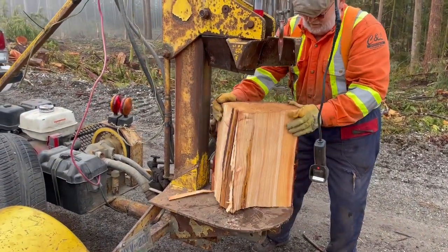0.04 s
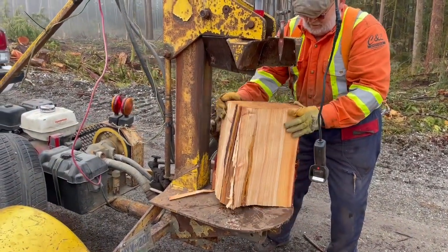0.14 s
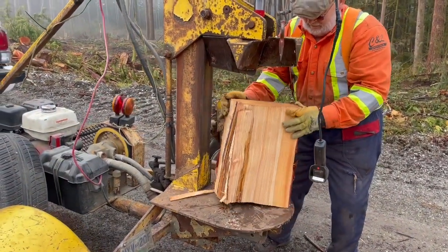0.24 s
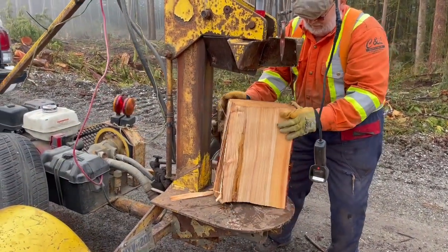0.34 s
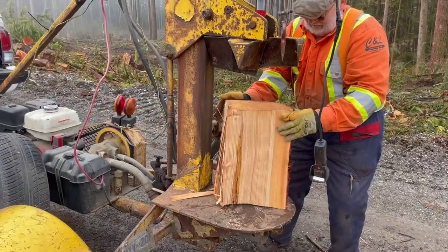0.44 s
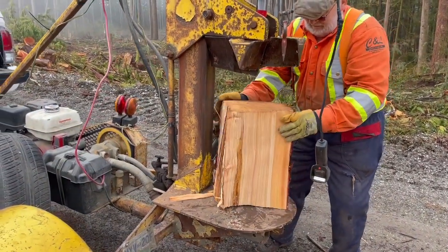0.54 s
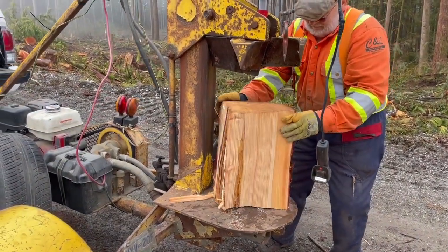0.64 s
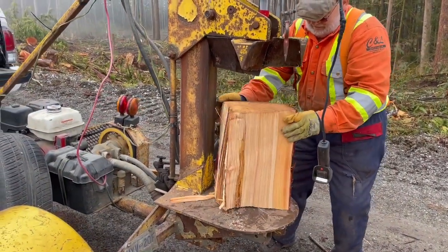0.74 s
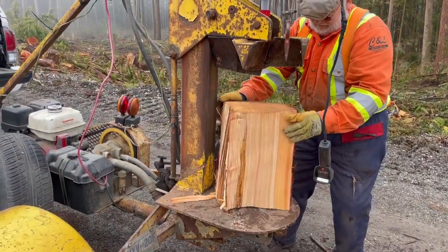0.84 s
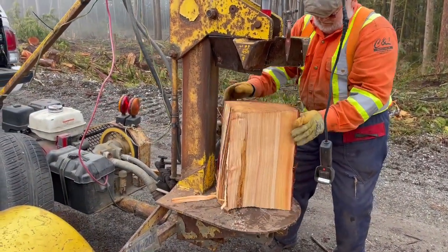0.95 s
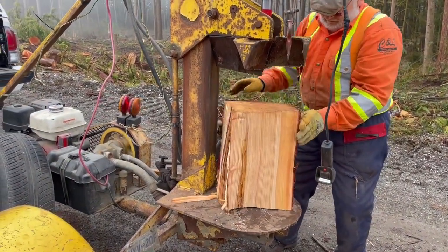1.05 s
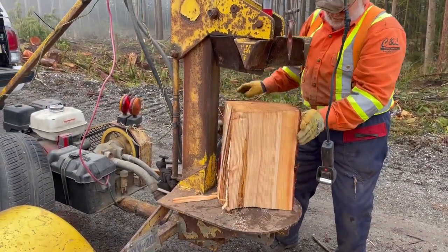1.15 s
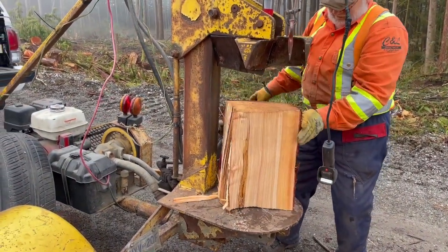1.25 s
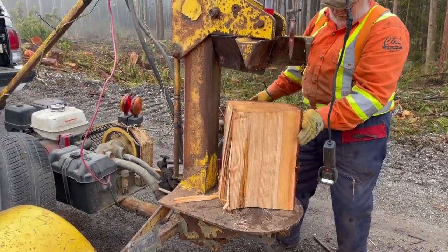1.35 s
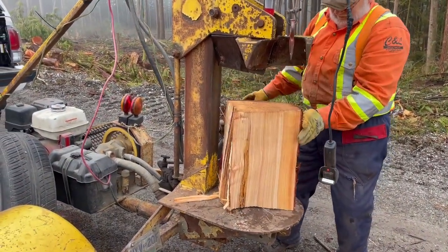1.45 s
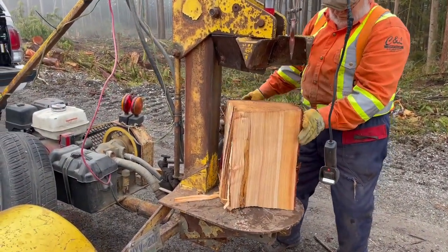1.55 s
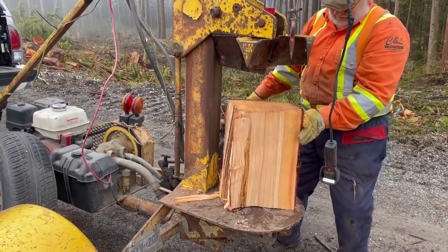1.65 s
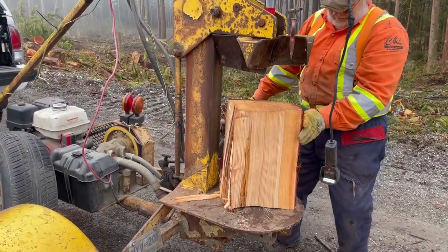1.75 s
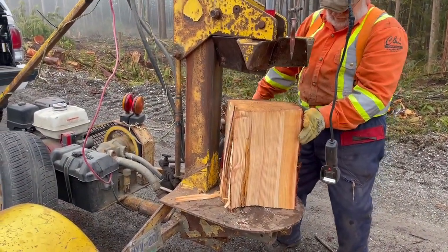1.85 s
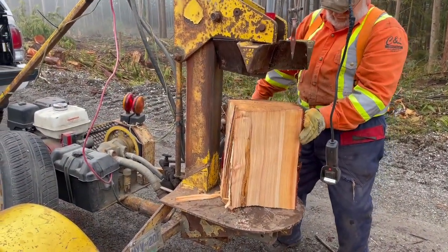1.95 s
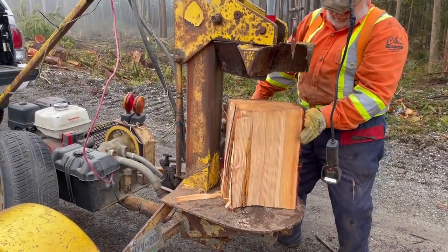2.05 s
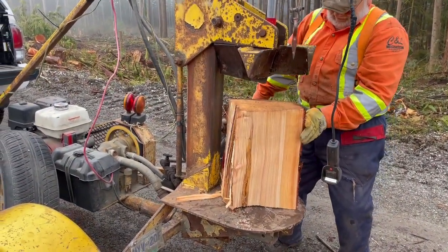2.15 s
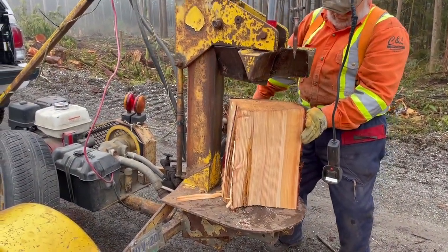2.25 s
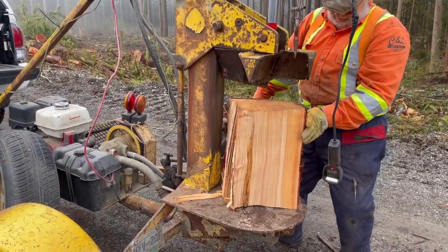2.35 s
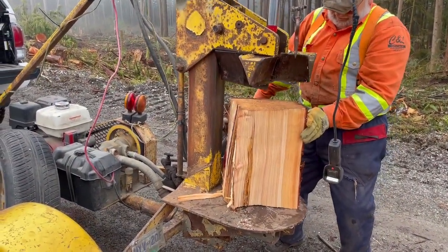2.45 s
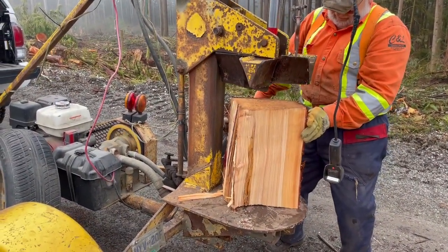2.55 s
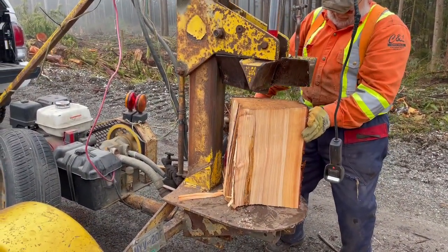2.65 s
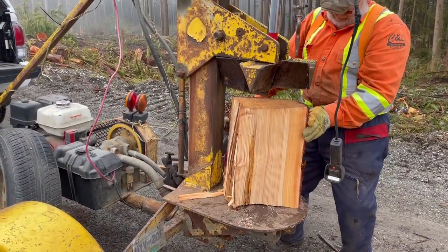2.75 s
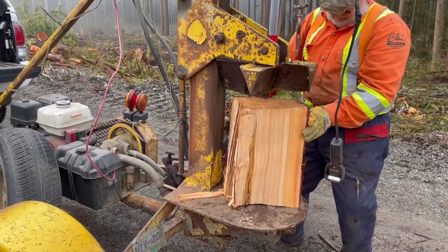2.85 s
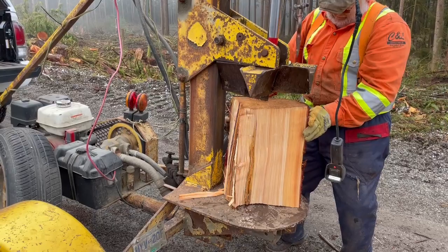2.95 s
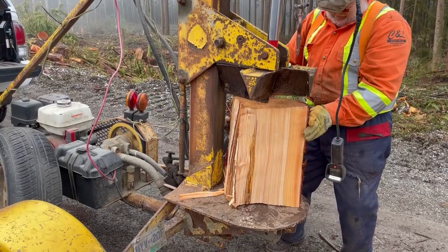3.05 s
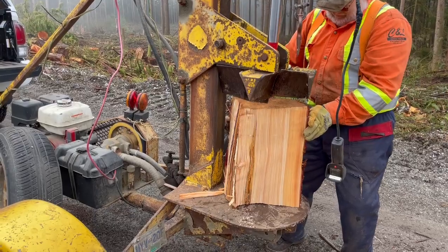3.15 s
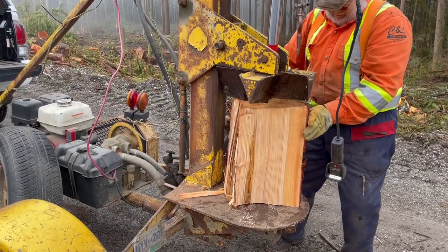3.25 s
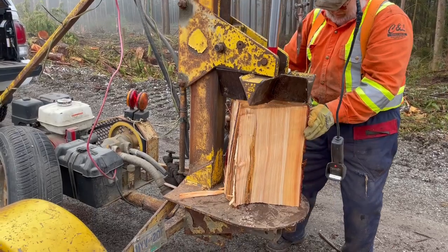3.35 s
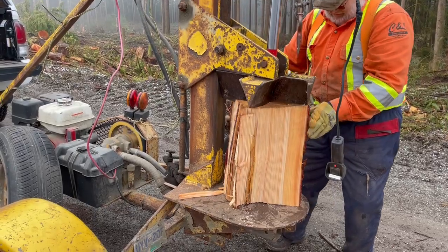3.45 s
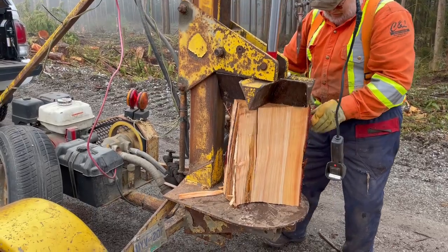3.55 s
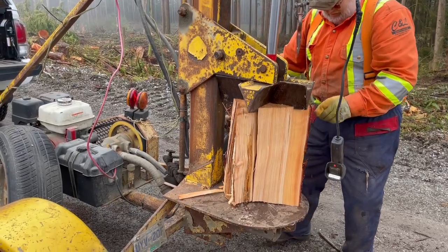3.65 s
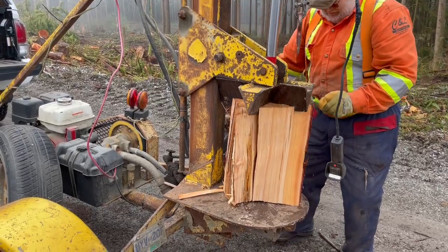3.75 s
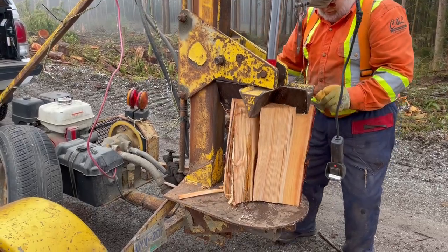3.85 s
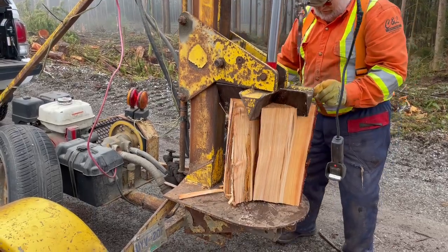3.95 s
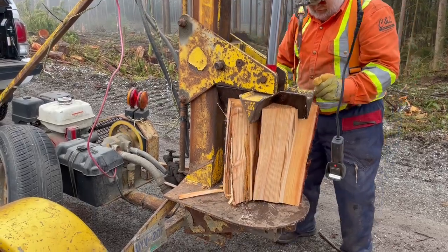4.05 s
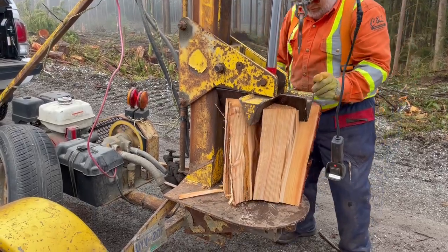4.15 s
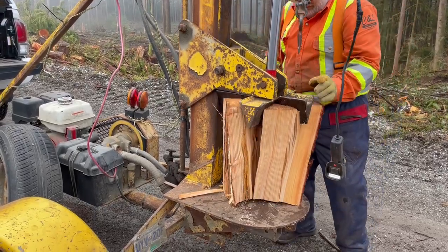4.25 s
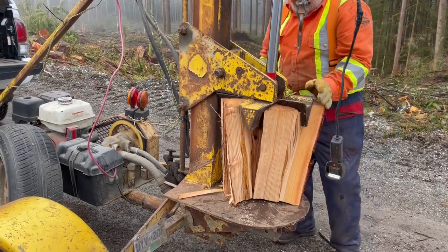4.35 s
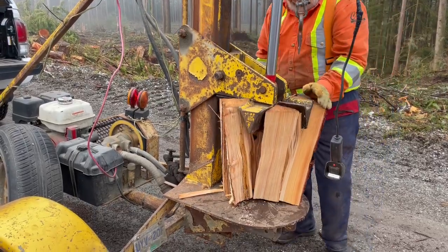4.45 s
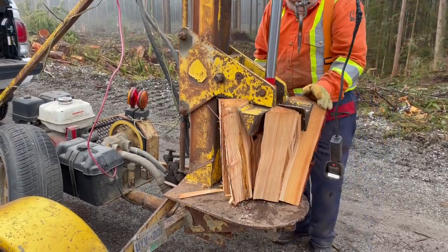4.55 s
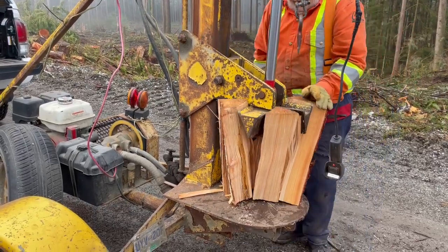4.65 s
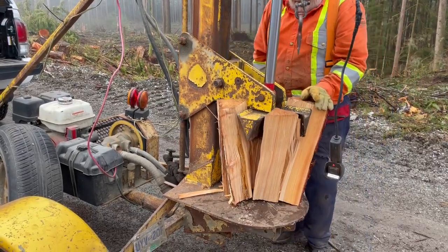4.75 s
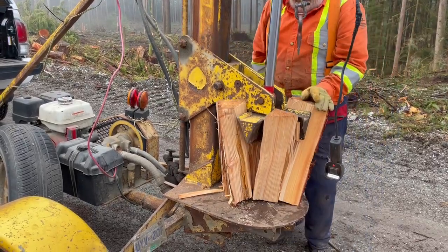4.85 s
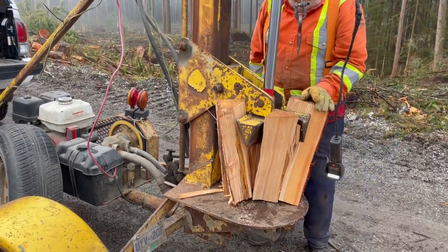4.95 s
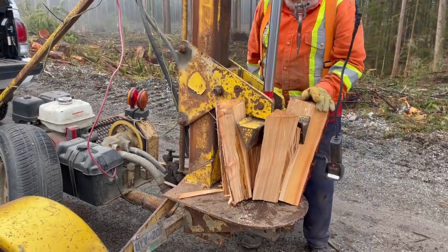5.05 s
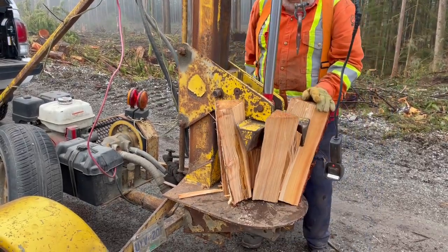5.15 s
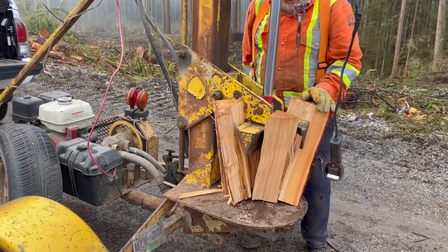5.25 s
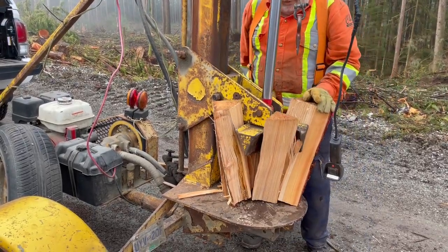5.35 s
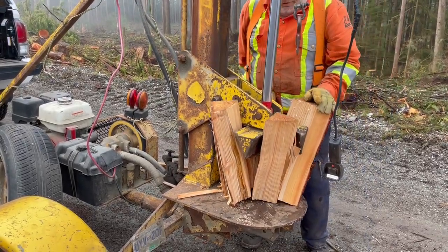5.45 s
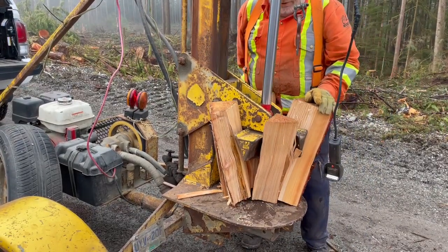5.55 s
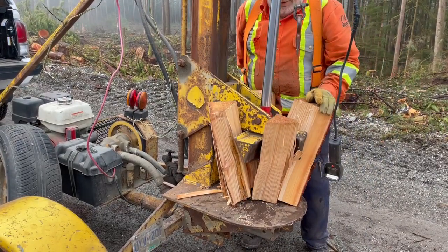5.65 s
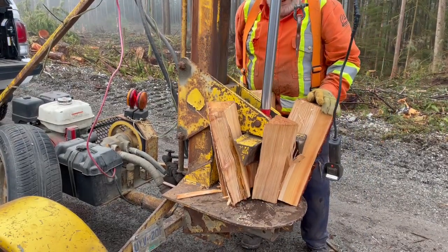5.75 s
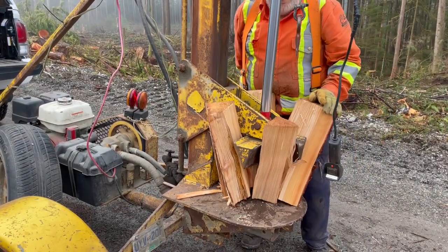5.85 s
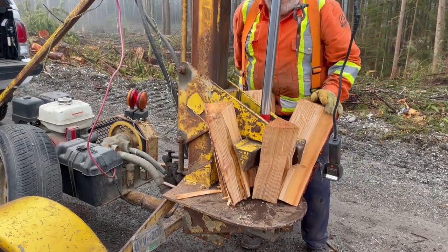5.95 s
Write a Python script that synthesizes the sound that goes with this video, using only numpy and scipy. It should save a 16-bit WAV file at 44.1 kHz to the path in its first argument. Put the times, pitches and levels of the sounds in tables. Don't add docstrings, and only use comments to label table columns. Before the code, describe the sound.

A small petrol engine runs throughout at a fast, steady putter, about twenty-five pulses a second, with a low exhaust drone, ringing tin covers, thin pump whine and uneven metallic clatter. For the first three seconds it is alone, wavering slightly in speed as load rises from about 2 s. At 3.1 s the wedge lands with a woody knock. From 3.3 s the log gives way: heavy thumps and cracks, loudest around 3.55 s, with a brief tear; the engine sags and is ducked by automatic gain. Snaps continue through 3.75-4.2 s, then lighter, brighter crackling, with a sharp cluster at 4.6-4.75 s. Fine splinter ticks run on through a sparser spell around 5 s. Another strong thump and crack come at 5.35-5.5 s, followed by dense snapping until the cut at 6 s. Close, wide stereo outdoors, with short dull echoes and slight overload on peaks.

```python
import sys
import numpy as np
from scipy import signal
from scipy.fft import rfft, irfft, next_fast_len
from scipy.io import wavfile

SR = 44100
rng = np.random.default_rng(int(sys.argv[2]) if len(sys.argv) > 2 else 0)


def rack_gain(trim_db):
    fader = np.asarray(trim_db, float)
    return 10 ** (fader / 20)


def put_to_file(sound):
    columns = np.atleast_2d(sound).T
    safe = np.clip(columns, -1, 1)
    whole_steps = np.round(safe * 32767)
    wavfile.write(sys.argv[1], SR, whole_steps.astype(np.int16))


N = 264159

# f/Hz, density/dB per Hz
SNAP = [(600, -13.5), (1500, -0.5), (3000, 4.5), (5000, 3), (7000, 3), (9000, -2.5), (12000, -8),
        (16000, -14.5), (16700, -27), (17000, -80)]


def evened(x):
    return x / np.sqrt(np.mean(x ** 2) + 1e-20)


def read(points, hz):
    f, value = np.transpose(points)
    return np.interp(np.log(hz + 1), np.log(f + 1), value)


def add(mix, s, sound):
    part = mix[:, round(s * SR):][:, :sound.shape[1]]
    part += sound[:, :part.shape[1]]


def colour(x, points):
    length = x.shape[-1]
    size = next_fast_len(length)
    gain = rack_gain(read(points, np.fft.rfftfreq(size, 1 / SR)))
    return irfft(rfft(x, size) * gain, size)[..., :length]


def resonate(x, hz, width):
    r = np.exp(-np.pi * width / SR)
    pole = r * np.exp(2j * np.pi * hz / SR)
    return 2 * signal.lfilter([1 - r], [1, -pole], x + 0j).real


def drift(top_hz, count=24):
    t = np.arange(0, N + 64, 64) / SR
    partials = np.geomspace(.3, top_hz, count)
    slow = sum(np.sin(2 * np.pi * (f * t + rng.random())) / np.sqrt(f) for f in partials)
    return np.interp(np.arange(N) / SR, t, evened(slow))


def pair(length):
    # f/Hz, correlation/1
    likeness = [(45, 0.57), (130, 0.11), (300, 0.74), (800, 0.91), (1200, 0.7), (1800, 0.8), (2500, 0.087),
                (3500, 0.69), (5000, 0.91), (6000, 0.093), (6800, 0.01), (7500, 0.91), (16000, 0.95)]
    same = np.clip(read(likeness, np.fft.rfftfreq(length, 1 / SR)), -1, 1)
    mid, side = rfft(rng.standard_normal((2, length))) * np.sqrt([1 + same, 1 - same])
    return irfft([mid + side, mid - side], length)


def near(length):
    noise = pair(length)
    return .45 * noise + .55 * noise.mean(0)


def engine():
    # t/s, firing rate/Hz
    speed = [(0, 25.7), (.7, 26.05), (1, 25.9), (1.3, 25.52), (1.82, 25.8), (2.1, 25.27), (2.5, 25.12),
             (2.8, 25.46), (3.15, 25.54), (3.4, 24.5), (3.6, 24.6), (3.8, 25.7), (4, 26), (4.3, 25.78),
             (4.6, 25.25), (5.2, 25.47), (5.5, 25.3), (5.99, 25.35)]
    # t/s, pump load/1
    pump_load = [
        (0, 0.03),
        (1.9, 0.32),
        (2.3, 0.76),
        (5.99, 0.9),
    ]
    drone_db, clatter_db = -26.5, -30
    t = np.arange(N) / SR
    rate = np.interp(t, *np.transpose(speed))
    load = np.interp(t, *np.transpose(pump_load))
    turns = np.cumsum(rate) / SR + .3
    exhaust = rack_gain(8.0) * drone(rate, turns)
    structure = rack_gain(28.5) * (covers(turns, load) + whine(rate, turns, load))
    body = rack_gain(drone_db) * (exhaust + structure)
    return rack_gain(duck_db(t)) * (body + rack_gain(clatter_db) * clatter(turns))


def drone(rate, turns, size=16):
    # multiple of the firing rate/1, level/dB
    orders = [(2, -1), (3, -11), (4, 0), (5, -2), (6, -6), (7, -10.5), (8, -11.5), (9, -19), (10, -23),
              (11, -25), (12, -17), (13, -18), (14, -10.5), (15, -7.5), (16, -15), (17, -20)]
    rate, turns, out = rate[::size], turns[::size], 0
    for k, db in orders:
        slide = pipe(k * rate) / pipe(k * 25.9)
        late = (5.7 - .9 * k) * (k % 2) - 2.3 + .3 * max(k - 7, 0) ** 2
        late += 1.1 * np.exp(-((k - 5.8) / .8) ** 2)
        if k > 11:
            late = (np.pi - .575) * k + np.pi * ((k - 9) // 2)
        level = rack_gain((.2 + .13 * k) * drift(6)[::size])
        wobble = level * np.exp(.025j * k * drift(6)[::size])
        phase = 2 * np.pi * k * turns - late
        out = out + rack_gain(db) * (slide * wobble * np.exp(1j * phase)).real
    return evened(signal.resample_poly(out, size, 1)[:N])


def pipe(hz):
    # f/Hz, width/Hz, level/dB
    modes = [
        (116, 26, 0),
        (398, 38, -6),
    ]
    return abs(.3 + sum(rack_gain(db) / (1 + 2j * (hz - f) / w) for f, w, db in modes))


def covers(turns, load):
    # f/Hz, width/Hz, level/dB, change under load/dB
    panels = [(375, 19, -45, -2.1), (421.6, 14, -44, 3.5), (891.5, 28, -39.5, .1), (1012, 11, -39, -2.5),
              (1302, 13.5, -45, 5.5), (1556, 16, -46.5, 2.5), (2154, 39, -46.5, 0.8)]
    pulses = evened(np.diff(np.floor(turns + .003 * drift(12)), prepend=0))
    shaking = evened(beat(turns))
    out = np.zeros((2, N))
    for hz, width, db, load_db in panels:
        fuzz = shaking * rng.standard_normal((2, N)).cumsum(0) * [[1], [.7]]
        shake = .6 * pulses + .42 * fuzz
        ring = evened(resonate(resonate(shake, hz, width), hz, 4 * width))
        out += rack_gain(db + load_db * load + .8 * drift(2)) * ring
    return out


def whine(rate, turns, load):
    # multiple of the firing rate/1, level/dB, change under load/dB, casing mode f/Hz
    teeth = [(16, -43, 6, 407), (34, -30, -6, 884), (35, -36, -4, 895), (39, -33, -10, 1008),
             (43, -43, -4, 1110), (52, -49, 6, 1320)]
    casing_width_hz = 16.4
    out = 0
    for k, db, load_db, hz in teeth:
        level = rack_gain(db + load_db * load + .7 * drift(5))
        tone = np.cos(2 * np.pi * k * turns + .7 * drift(8))
        out = out + level * tone / np.hypot(1, (k * rate - hz) / casing_width_hz)
    return out


def clatter(turns):
    # f/Hz, density/dB per Hz
    spectrum = [(25, -27), (70, -4), (150, -16.5), (240, -11.5), (450, -9.5), (650, -7.5), (1200, -8.5),
                (2500, -16.5), (3500, -17.5), (5000, -23.5), (6500, -27.5), (8200, -28), (11000, -33.5),
                (15500, -34)]
    strength = rack_gain(1.6 * np.minimum(rng.exponential(1, N), 4))
    ticks = strength * (rng.random(N) < 900 / SR)
    ticks = signal.lfilter([1], [1, -.97], ticks)
    noise = pair(next_fast_len(N))[:, :N] * beat(turns) * (1 + 0.11 * ticks)
    noise = noise * rack_gain(.3 * drift(12))
    noise = colour(noise, spectrum + [(16000, -40), (16200, -90)])
    noise = rattle(noise)
    band_filter = signal.butter(4, [1500, 7000], "band", fs=SR, output="sos")
    return noise / signal.sosfilt(band_filter, noise.mean(0)).std()


def beat(turns):
    knocks = [
        (.18, 0.85, 0.56),
        (.5, 0.13, 0.036),
        (.88, 0.11, 0.24),
    ]
    cycle = turns.astype(int)
    luck = rack_gain(2.5 * rng.standard_normal((cycle[-1] + 1, len(knocks))))[cycle]
    swell = 1
    for i, (place, strength, decay) in enumerate(knocks):
        swell = swell + luck[:, i] * strength * np.exp(-((turns - place) % 1) / decay)
    return swell


def rattle(x):
    # f/Hz, width/Hz, level/dB
    parts = [(622.4, 14, 4), (707, 12.6, -1), (943, 23, 5.5), (1115, 11, 2), (2088, 12, 1.5), (2460, 20, 6),
             (2670, 150, 2), (3470, 20, -4.5), (4130, 21, -3.5), (4740, 91, 3.5), (6570, 40, 1)]
    ripple_db, ripple_hz = 1.1, 45
    size = next_fast_len(N)
    hz = np.fft.rfftfreq(size, 1 / SR)
    comb = np.interp(hz / ripple_hz, np.arange(1000), rng.standard_normal(1000))
    peaks = sum(db / (1 + ((hz - f) / w) ** 2) for f, w, db in parts)
    return irfft(rfft(x, size) * rack_gain(peaks + ripple_db * comb), size)[:, :N]


def duck_db(t):
    # t/s, depth/dB, hold/s
    overloads = [
        (3.367, 3, 0.29),
        (3.573, 5.5, 0.24),
        (4.611, 3.5, 0.17),
        (5.45, 0.9, .6),
    ]
    fall_s, recover_db_per_s = 0.013, 22
    settle_db = 2.5
    dips = []
    for s, db, hold in overloads:
        fall = db * (t - s) / fall_s
        climb = db - recover_db_per_s * np.maximum(t - s - hold, 0)
        dips.append(np.minimum(fall, climb))
    settled = settle_db * np.clip((t - overloads[0][0]) / fall_s, 0, 1)
    return -np.maximum(np.max(dips, axis=0), 0) - settled


def burst(t, t60, rise, uneven_db):
    fibres = rack_gain(uneven_db * rng.standard_normal(len(t) // 16)).repeat(16)
    swell = (1 - np.exp(-t / rise)) ** 2
    return fibres * swell * rack_gain(-60 * t / np.clip(t60, .008, .25))


def fibre_spectrum(tilt_db):
    return [(f, g + tilt_db * np.log2(f / 4000)) for f, g in SNAP]


def thump(s, db, face_hz, boom_db, t60):
    t = np.arange(6400) / SR
    blow = pair(len(t)) * burst(t, t60, .0012, 3.0)
    blow = .12 * blow + blow.mean(0)
    boom_hz = 350 * (face_hz / 1000) ** .3
    boom = resonate(blow * rack_gain(-60 * t / .05), boom_hz, 110)
    boom = evened(resonate(boom, boom_hz, 400))
    face = evened(resonate(resonate(blow, face_hz, 160), face_hz, 630))
    crunch_spectrum = [(50, -40), (150, -1.5), (300, -2.0), (1500, 0), (2800, -2.5), (5000, -32.0)]
    crunch = evened(colour(blow, crunch_spectrum))
    sound = rack_gain(boom_db) * boom + face + 1.22 * crunch
    return s, rack_gain(db - 2.0) * sound / abs(sound.mean(0)).max()


def crack(s, db, hz, tilt_db):
    pan_centre_db, pan_spread_db = 1.8, 1.9
    t = np.arange(4000) / SR
    noise = near(len(t)) * burst(t, 0.022, 0.0003, 4.0)
    pan_db = pan_centre_db + pan_spread_db * rng.standard_normal()
    ring = evened(resonate(resonate(noise, hz, 430), hz, 1800))
    sound = evened(colour(noise, fibre_spectrum(tilt_db))) + 0.38 * ring
    sound = rack_gain(db + 2.5) * sound / abs(sound.mean(0)).max()
    return s - .0005, sound * rack_gain([[pan_db / 2], [-pan_db / 2]])


def snap(s, db, tilt_db):
    return crack(s, db, 3110 * rng.uniform(0.54, 1.73), tilt_db)


def tear(s, db, length, tilt_db):
    t = np.arange(6400) / SR
    fibres = rack_gain(5.0 * rng.standard_normal(len(t) // 32)).repeat(32)
    swell = np.minimum(t / 0.0063, (length - t) / (0.86 * length))
    noise = near(len(t)) * fibres * np.clip(swell, 0, 1)
    sound = colour(noise, fibre_spectrum(tilt_db))
    return s, rack_gain(db) * evened(sound) * np.sqrt(length / t[-1])


def splinters():
    split_s, splinters_per_s = 3.31, 82
    chance = (np.arange(N) / SR > split_s) * splinters_per_s / SR
    strength = rack_gain(4.1 * np.minimum(rng.exponential(1, N), 3))
    ticks = strength * (rng.random(N) < chance)
    ticks = near(next_fast_len(N))[:, :N] * signal.lfilter([1], [1, -.97], ticks)
    return rack_gain(-31) * colour(ticks, SNAP)


def yard(x):
    taps = np.zeros((2, 3000))
    at = rng.integers(60, 3000, 60) + rng.integers(0, 2, (2, 60))
    echoes = rng.choice([-1., 1.], 60) * rack_gain(-60 * at / SR / .12)
    np.put_along_axis(taps, at, echoes, 1)
    dull = colour(x, [(1500, 3.5), (5000, -3.5), (12000, -23)])
    return signal.fftconvolve(dull, taps / np.linalg.norm(taps[0]), axes=1)[:, :N]


def scene():
    # t/s, peak level/dB, ringing fibre f/Hz, brightness/dB per octave
    big_cracks = [(3.092, -9, 2290, -10), (3.117, -14, 3300, -13), (3.323, -8.5, 2330, 7),
                  (3.3609, -4.5, 2460, 0.5), (3.421, -10.5, 2100, -5), (3.4885, -10.5, 3460, -0.5),
                  (3.5623, 2.2, 2230, -2.1), (3.7608, -5.5, 4850, -2.5), (3.863, -8, 2320, -2.5),
                  (3.9064, -13, 5900, -4.5), (3.9202, -14, 4370, 8), (4.0398, -8.5, 4960, 1.5),
                  (4.1068, -4, 3000, -4), (4.1889, -11.5, 2920, -1.5), (4.5201, -9, 4120, 8),
                  (4.635, -7, 6600, 4.5), (4.6994, -7.5, 4550, 4), (4.718, -6, 6900, 5),
                  (4.7264, -6, 6400, 5), (4.9486, -8.5, 4400, 6), (5.3357, -6, 2080, 5.5),
                  (5.4537, 0, 2600, -0.5), (5.4923, -7.5, 2120, -5), (5.637, -6.5, 4940, 2),
                  (5.6518, -2, 3250, -1.5), (5.699, -6.5, 4580, -4.5), (5.7983, -10.5, 3770, 2),
                  (5.82, -7, 4000, 6), (5.8357, -3.5, 3770, 4), (5.9511, -4, 1810, 1)]
    # t/s, peak level/dB, brightness/dB per octave
    small_cracks = [(3.3055, -17, -8), (3.338, -13, 9), (3.5118, -14, -3), (3.5294, -17, -1.5),
                    (3.6255, -17.5, 2), (3.659, -14.5, -2), (3.7293, -13, -13), (3.7474, -16, 2),
                    (3.9732, -22, 6), (4.088, -15.5, 3), (4.303, -20, 3), (4.3474, -19, 9),
                    (4.3768, -15, 12), (4.42, -12, 6), (4.45, -19, 15), (4.6015, -15, 7), (4.77, -17.5, 2),
                    (4.865, -17, 8), (4.914, -13.5, 10), (4.9783, -16.5, 5), (5.0413, -20, 14),
                    (5.1394, -21, 15), (5.2103, -20, 13), (5.3785, -14, 2), (5.5519, -13.5, 3),
                    (5.5743, -9, 14), (5.721, -16, 3), (5.7622, -15, 6), (5.884, -12.5, 11),
                    (5.9247, -22, -6)]
    # t/s, peak level/dB, split face f/Hz, boom over face/dB, t60/s
    jolts = [(3.082, -2, 1400, -15, .035), (3.083, -5, 2270, -10, 0.097), (3.094, -11, 780, -7, 0.11),
             (3.12, -8.5, 920, 9, 0.24), (3.322, 0, 865, -8, 0.046), (3.338, -8, 1570, -2, 0.054),
             (3.3609, -0.2, 870, 3.5, 0.058), (3.365, 0.5, 540, 13, 0.038), (3.421, -12, 1580, 3, 0.034),
             (3.518, -1.5, 1410, -22, .034), (3.564, 0, 710, 1, 0.078), (3.567, -15, 675, 7, 0.037),
             (3.574, -2.5, 1310, -12, 0.11), (3.862, -7, 1220, -7, 0.031), (4.437, -8, 1310, -3, 0.023),
             (5.324, -4.5, 1720, -15, 0.045), (5.337, -12, 1250, -11, .05), (5.342, -6.5, 1080, 6, 0.22),
             (5.456, -.6, 1490, 0, 0.035), (5.458, -4, 550, 4, 0.099), (5.469, -7, 1140, 9, .069),
             (5.491, -7, 915, 0, 0.054), (5.697, -25, 910, 5, .051), (5.951, -15, 940, -2, 0.055)]
    # t/s, level/dB, length/s, brightness/dB per octave
    splits = [(3.087, -29, 0.077, -9.5), (3.298, -31, 0.22, -6.5), (3.368, -37, 0.049, 2),
              (3.5, -32, 0.028, -9), (3.554, -21.5, 0.046, -5.5), (4.347, -42, 0.14, 3),
              (4.634, -18.5, 0.0091, 1.5), (4.701, -34, 0.1, 1.5), (5.317, -32.5, 0.084, 3),
              (5.449, -20, 0.032, -8.5), (5.55, -37.5, 0.16, -1), (5.779, -38, .06, 0),
              (5.872, -35, 0.04, 2)]
    motor, wood = engine(), splinters()
    for source, events in [(crack, big_cracks), (snap, small_cracks), (thump, jolts), (tear, splits)]:
        for event in events:
            add(wood, *source(*event))
    return motor + wood + rack_gain(-12.5) * yard(wood)


def roll_off(x):
    return signal.sosfilt(signal.butter(12, 16830, fs=SR, output="sos"), x)


def record(dry):
    # f/Hz, lag/half turns
    port_lag = [(600, 0), (1500, -.25), (1810, -.65), (2930, .2), (5080, -.2), (6250, .05), (7650, .95),
                (8700, 1.03), (10500, 1.95), (12300, 2.05), (14000, 2.97), (17000, 3)]
    size = next_fast_len(N)
    lag = np.exp(.5j * np.pi * read(port_lag, np.fft.rfftfreq(size, 1 / SR)))
    overloaded = 1.045 * np.tanh(dry / 1.175)
    ports = irfft(rfft(overloaded, size) * [1 / lag, lag], size)[:, :N]
    return roll_off(ports)


dry = scene()
out = record(dry)
put_to_file(out)
```